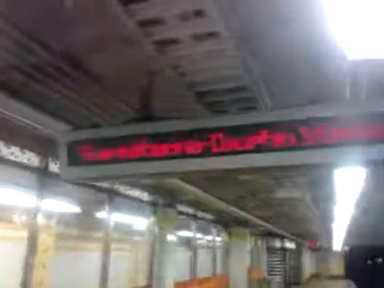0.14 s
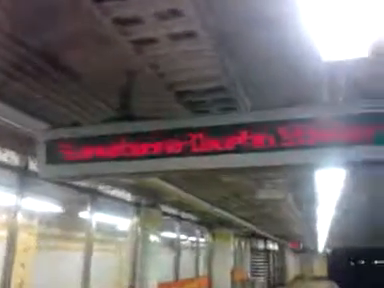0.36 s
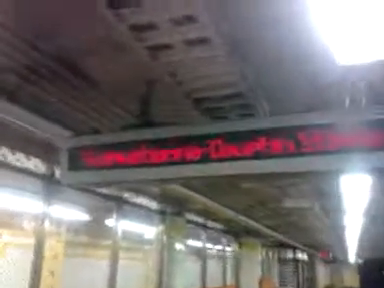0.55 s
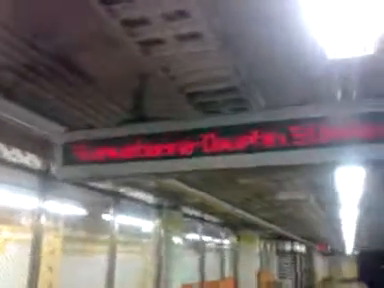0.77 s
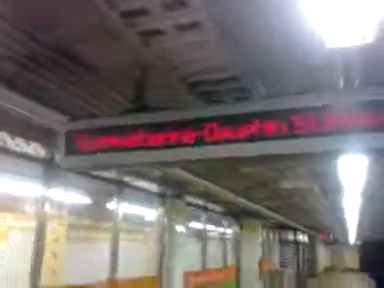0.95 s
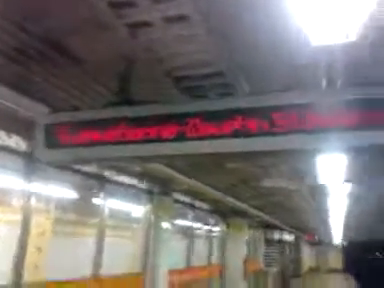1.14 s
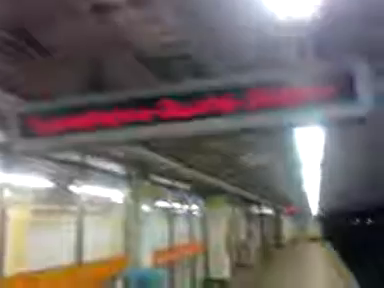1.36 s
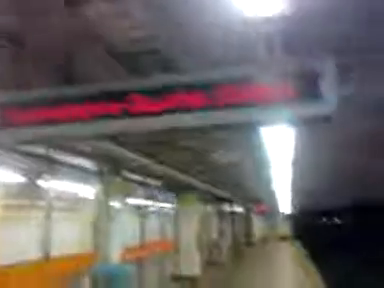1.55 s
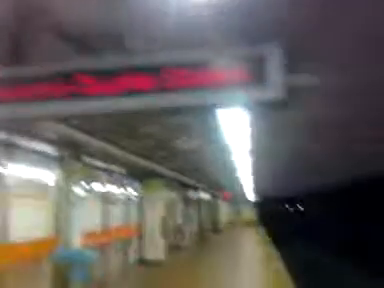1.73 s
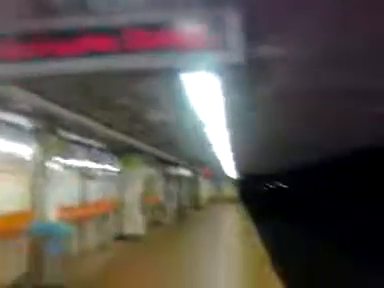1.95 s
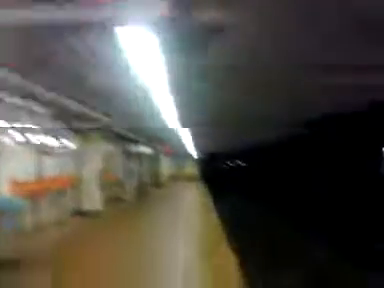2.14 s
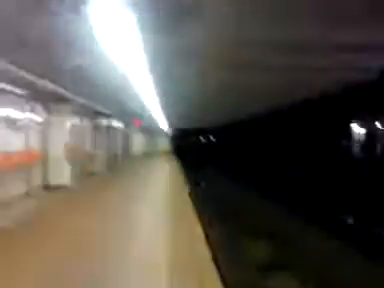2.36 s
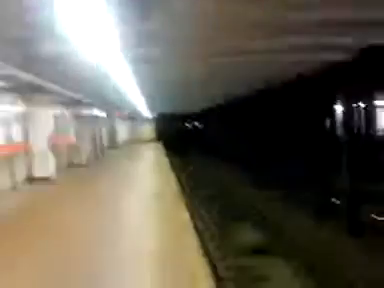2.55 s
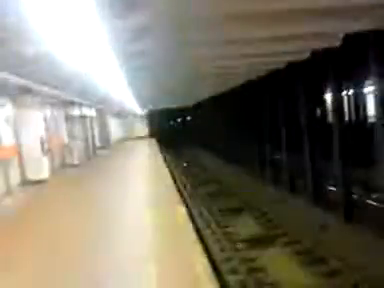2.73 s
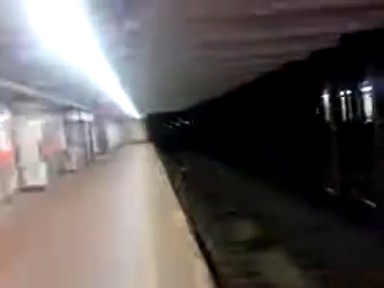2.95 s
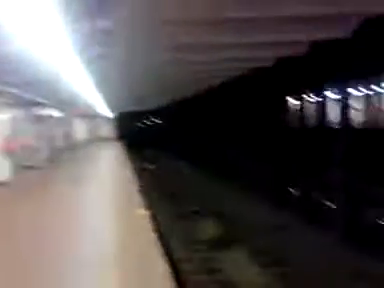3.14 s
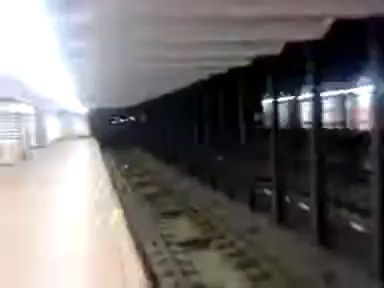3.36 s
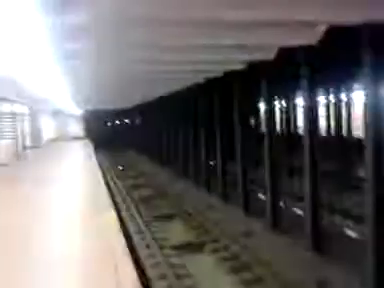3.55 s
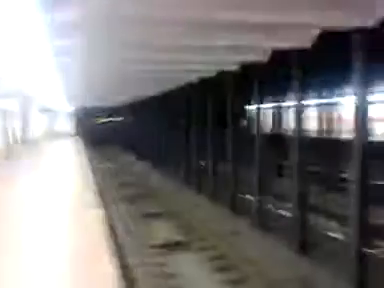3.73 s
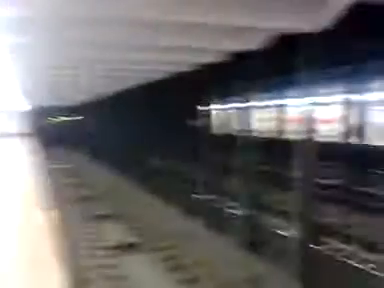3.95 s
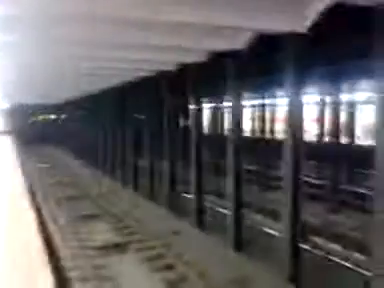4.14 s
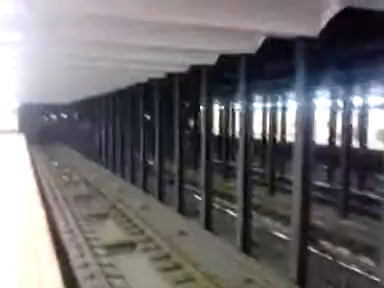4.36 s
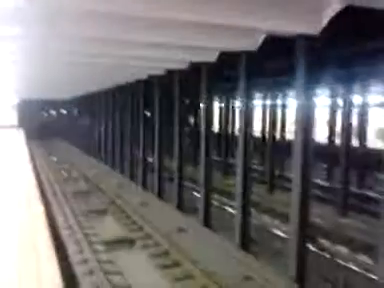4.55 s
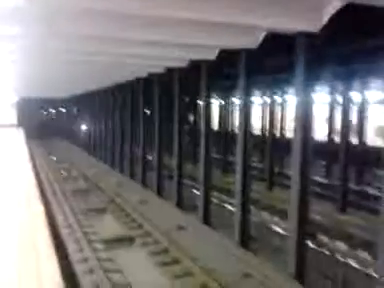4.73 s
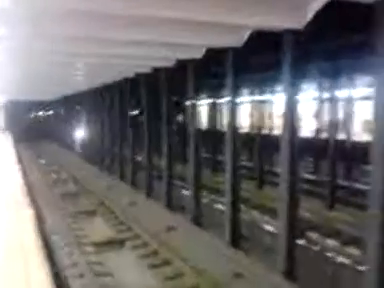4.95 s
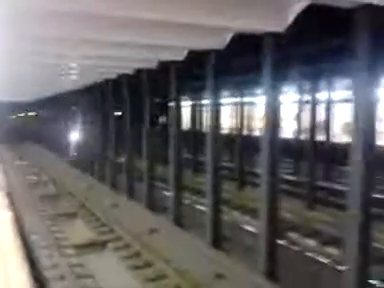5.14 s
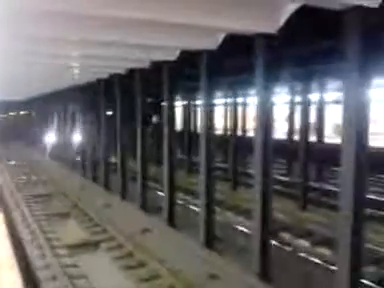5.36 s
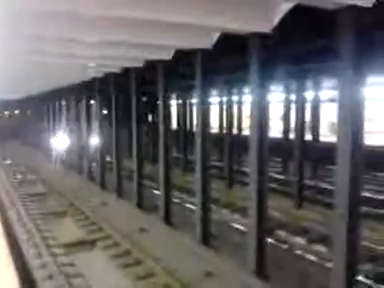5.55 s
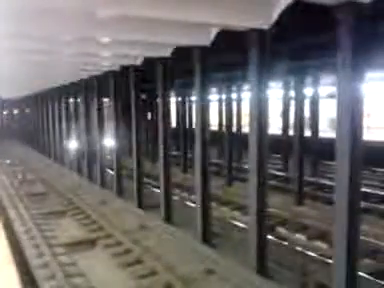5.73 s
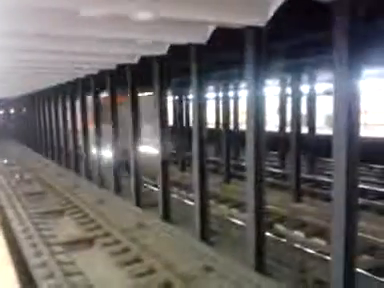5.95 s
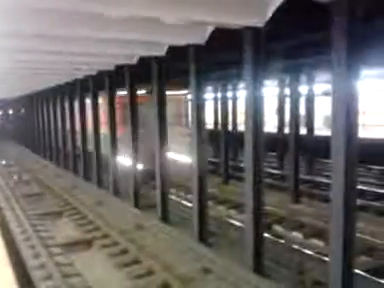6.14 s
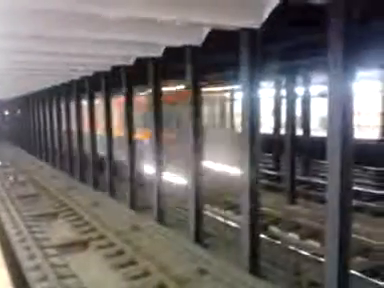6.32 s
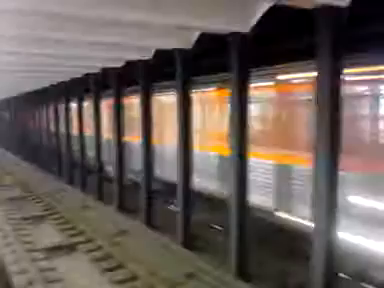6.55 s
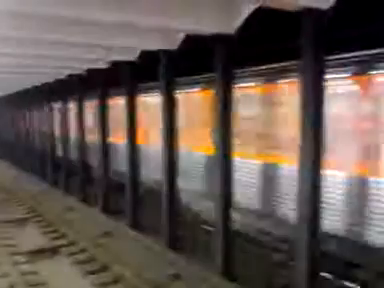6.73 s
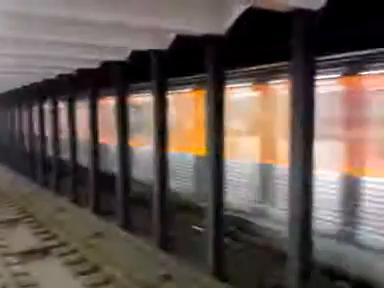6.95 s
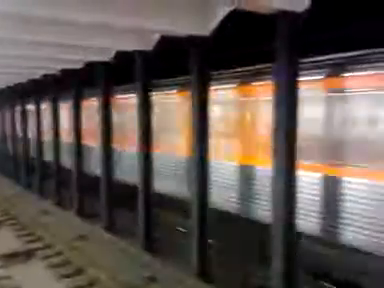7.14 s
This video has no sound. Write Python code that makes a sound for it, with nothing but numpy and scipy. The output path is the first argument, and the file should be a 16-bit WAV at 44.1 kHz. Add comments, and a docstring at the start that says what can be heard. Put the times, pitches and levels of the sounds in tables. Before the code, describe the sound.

Distant low train rumble grows for seconds, then steel wheels roar and knock past in an underground station, crackling and choking the phone microphone.

```python
"""Subway train passing a platform

A train comes out of its tunnel and runs past, heard by a small telephone-band microphone.
Shaped noise turns from dull tunnel boom to the roar and hiss of steel wheels; noise bursts clatter over it.
A short gliding sine is a flange squeak. Hard clipping adds a harsh rasp as the recorder overloads.
The level dips for instants as the train's air hits the microphone."""
import sys
import numpy as np
from scipy import signal
from scipy.fft import rfft, irfft
from scipy.io import wavfile
from scipy.ndimage import uniform_filter1d

SR = 44100
rng = np.random.default_rng(int(sys.argv[2]) if len(sys.argv) > 2 else 0)


def transcribe(u):
    """Save the signal u as a 16-bit wav file named by the first command-line argument.

    u: samples, shape (n,) or (channels, n), limited to [-1, 1]; the rate is SR.
    q: integer samples, one column per channel.
    """
    v = np.clip(np.atleast_2d(u).T, -1, 1)
    q = np.round(v * 32767).astype(np.int16)
    wavfile.write(sys.argv[1], SR, q)


N = 317079
TIME_S = np.arange(N) / SR


def amp(db):
    """Decibels to gain."""
    return 10 ** (np.asarray(db) / 20)


def unit(x):
    """Scales to an rms of one."""
    return x / np.sqrt(np.mean(x ** 2) + 1e-20)


def spectrum(points, hz):
    """Reads a table along a log-frequency axis."""
    point_hz, value = np.transpose(points)
    return np.interp(np.log(hz + 1), np.log(point_hz + 1), value)


def curve(rows, t_s):
    """Reads a two-column time table at the times t_s."""
    row_s, value = np.transpose(rows)
    return np.interp(t_s, row_s, value)


def swell(t_s, centre_s, spread_s):
    """Bell curve in time with a peak of one."""
    return np.exp(-((t_s - centre_s) / spread_s) ** 2)


# microphone response: freq_hz, gain_db
MICROPHONE_RESPONSE = [(20, -28.5), (45, -22), (90, 1), (3300, 0.5), (3600, -10), (4000, -18.5),
                       (4250, -30.5), (4500, -41.5), (4900, -72), (5500, -110)]


def microphone_db(hz):
    """The small microphone passes only a telephone band."""
    return spectrum(MICROPHONE_RESPONSE, hz)


def coloured(points):
    """Steady noise of a given colour, as the microphone hears it."""
    hz = np.fft.rfftfreq(N, 1 / SR)
    gain = amp(spectrum(points, hz) + microphone_db(hz))
    return unit(irfft(rfft(rng.standard_normal(N)) * gain, N))


def drift(count, depth_db, span_s, step_s):
    """A smooth random wander in dB, one value per step."""
    lag_s = np.arange(-count, count + 1) * step_s
    kernel = np.exp(-np.pi * (2 * lag_s / span_s) ** 2)
    return depth_db * unit(signal.fftconvolve(rng.standard_normal(3 * count), kernel, "valid"))


def patches(shape, size):
    """Random unevenness over (frames, bins), in patches of the given size."""
    field = uniform_filter1d(rng.standard_normal(shape), size[0], axis=0)
    return unit(uniform_filter1d(field, size[1], axis=1))


# air pushed ahead of the train: centre_s, spread_s, extra_rumble_db
PUSHED_AIR = (4.05, 0.35, 2.8)


def air_push_db(t_s):
    """Air pushed ahead of the train booms at the tunnel mouth: one swell of deep rumble."""
    centre_s, spread_s, extra_rumble_db = PUSHED_AIR
    return extra_rumble_db * swell(t_s, centre_s, spread_s)


# tunnel mouth resonates as the first car leaves it: centre_s, spread_s, centre_hz, width_hz, level_db
HOLLOW_RESONANCE = (5.0, 0.51, 355, 53, 2.6)


def mouth_resonance_db(t_s, hz):
    """A low hollow resonance of the tunnel mouth swells and fades."""
    centre_s, spread_s, centre_hz, width_hz, level_db = HOLLOW_RESONANCE
    return level_db * swell(t_s, centre_s, spread_s) / (1 + ((hz - centre_hz) / width_hz) ** 2)


def judder(depth_db=0.2, size_samples=2500):
    """Many distant joints make the whole roar shake slightly."""
    wander = signal.oaconvolve(rng.standard_normal(N), np.hanning(size_samples), "same")
    return amp(depth_db * unit(wander))


# flange on rail: start_s, length_s, pitch_hz, rise_over_length_hz, level_db
FLANGE_SQUEAK = (6.877, .025, 1490, 130, 3.5)


def squeak():
    """One wheel mode swells and dies, sliding up a little."""
    start_s, length_s, pitch_hz, rise_hz, level_db = FLANGE_SQUEAK
    progress = np.clip((TIME_S - start_s) / length_s, 0, 1)
    turns = np.cumsum(pitch_hz + rise_hz * progress) / SR
    return amp(level_db) * np.sin(np.pi * progress) ** 2 * np.sin(2 * np.pi * turns)


# wheels over rail joints: start_s, level_re_roar_db, decay_s
JOINT_KNOCKS = [(5.325, -1, 0.017), (5.57, -3.5, 0.025), (5.94, -2, 0.017), (6.209, 2.5, 0.019),
                (6.353, 2, 0.027), (6.45, -5.5, 0.02), (6.583, -2, 0.029), (6.743, 4.5, .018),
                (6.934, 2, 0.046), (7.055, -1.5, .025), (7.109, -1.5, 0.023)]
# colour a knock rings with: freq_hz, density_db_per_hz
KNOCK_COLOUR = [(100, -22), (400, -1.5), (800, 8.5), (1200, 1), (1700, -1.5), (2500, 0), (3300, -5.5)]


def clatter(rise_s=0.0089):
    """Each rail-joint knock is smeared by the station's walls into a short bright burst."""
    envelope = np.zeros(N)
    for start_s, level_db, decay_s in JOINT_KNOCKS:
        age_s = np.maximum(TIME_S - start_s, 0)
        rise = np.minimum(age_s / rise_s, 1)
        decay = np.exp(-np.maximum(age_s - rise_s, 0) / decay_s)
        envelope += amp(level_db) * rise * decay
    return envelope * coloured(KNOCK_COLOUR)


# train place, 0 deep in tunnel, 1 at mouth, 2 alongside (held there): time_s, nearness
TRAIN_PLACE = [(.4, 0), (3.7, 0.95), (4.5, 1), (6, 2.15)]
# rolling colour at those three places: freq_hz, density_db_per_hz
TUNNEL_COLOUR = [(90, -6), (150, -5), (200, 0.0), (280, -4.0), (335, -12), (480, -8), (620, -6.5),
                 (790, -2.9), (1170, -12), (1650, -12), (2000, -21), (2400, -21.5), (2950, -27.0),
                 (3250, -23.6)]
MOUTH_COLOUR = [(90, -14), (150, -13.5), (190, -6.5), (270, -4.5), (370, -1.9), (500, -0.2), (600, -2),
                (790, -0.5), (1170, -8.9), (1600, -12.2), (2050, -21.4), (2450, -19.5), (2900, -22.5),
                (3250, -23.5)]
ALONGSIDE_COLOUR = [(90, -23.5), (150, -14), (200, -12), (280, -8.5), (370, -2.5), (560, -2), (720, 1.5),
                    (900, -4), (1250, -11.5), (1620, -11.0), (1950, -16.5), (2500, -18.5), (2850, -21.5),
                    (3250, -19)]
# treble above the rolling colour: time_s, level_db
TREBLE_LEVEL = [(0.4, 0.3), (2.7, -2.9), (3.4, -1.7), (4.4, 1.5), (5.8, 0.2), (7.0, 0.7)]
# uneven rail makes rumble and hiss drift apart: depth_db, span_s
RUMBLE_WANDER = (1.1, 0.25)
HISS_WANDER = (0.5, 0.2)


def rolling(size=2048, patchy_db=1.45, rumble_hz=260, hiss_hz=1550):
    """Rough wheels on rough rail, at even power: tunnel boom gives way to rail resonances and hiss."""
    hop = size // 4
    t_s = np.arange(N // hop + 3) * hop / SR
    hz = np.fft.rfftfreq(size, 1 / SR)
    frame_s = t_s[:, None]

    nearness = np.clip(curve(TRAIN_PLACE, frame_s), 0, 2)
    colour_db = 0
    for place, colour in enumerate([TUNNEL_COLOUR, MOUTH_COLOUR, ALONGSIDE_COLOUR]):
        share = np.maximum(1 - abs(nearness - place), 0)
        colour_db = colour_db + share * spectrum(colour, hz)

    rumble_db = air_push_db(t_s) + drift(len(t_s), *RUMBLE_WANDER, hop / SR)
    hiss_db = curve(TREBLE_LEVEL, t_s) + drift(len(t_s), *HISS_WANDER, hop / SR)
    colour_db = colour_db + rumble_db[:, None] / (1 + (hz / rumble_hz) ** 6)
    colour_db = colour_db + hiss_db[:, None] * (1 - 1 / (1 + (hz / hiss_hz) ** 5))
    colour_db = colour_db + mouth_resonance_db(frame_s, hz)

    # each wheel meets its own stretch of worn rail, so the bands flicker apart
    flicker_db = patchy_db * patches(colour_db.shape, size=(4, 14))
    gain = amp(colour_db + microphone_db(hz) + flicker_db)
    gain = gain / np.linalg.norm(gain, axis=1, keepdims=True)  # even power in every frame
    noise = rng.standard_normal(gain.shape) + 1j * rng.standard_normal(gain.shape)
    _, sound = signal.istft((gain * noise).T, nperseg=size, noverlap=size - hop)
    return unit(sound[:N])


START_DB, GROWTH_DB_PER_S, ALONGSIDE_S = -30.15, 4.2, 6.3
# faster climb as the first car nears the open station: start_s, length_s, extra_db
STATION_CLIMB = (3.4, 2.5, 2.35)


def approach_db(t_s):
    """The tunnel absorbs an equal share per metre: an even climb, steeper near the mouth, then steady."""
    start_s, length_s, extra_db = STATION_CLIMB
    climb_db = GROWTH_DB_PER_S * np.minimum(t_s, ALONGSIDE_S)
    return START_DB + climb_db + extra_db * np.clip((t_s - start_s) / length_s, 0, 1)


def scene():
    """Rolling noise and clatter grow together as the train closes in."""
    train = rolling() * judder() + clatter()
    return (amp(approach_db(TIME_S)) * train + squeak())[None]


# gusts on the microphone; depth is full only if length exceeds fall + recovery: start_s, length_s, depth_db
GUST_CHOKES = [(6.19, 0.019, -11), (6.723, 0.02, -14), (6.754, 0.012, -16), (6.767, 0.008, -9),
               (6.833, 0.02, -7), (6.891, 0.015, -9), (6.914, 0.018, -16), (7.084, 0.017, -12),
               (7.149, 0.012, -8), (7.174, 0.016, -11)]


def choke(fall_s=0.002, recovery_s=0.009):
    """The level dips for about a hundredth of a second, as when a gust pins the diaphragm."""
    dip_db = np.zeros(N)
    for start_s, length_s, depth_db in GUST_CHOKES:
        fall = (TIME_S - start_s) / fall_s
        recovery = (start_s + length_s - TIME_S) / recovery_s
        dip_db += depth_db * np.clip(np.minimum(fall, recovery), 0, 1)
    return amp(dip_db)


def record(dry, clip_level=0.705, edge_hz=15800):
    """Hard clipping makes the treble above the microphone's band: lone ticks, then a dense rasp."""
    clipped = np.clip(dry * choke(), -clip_level, clip_level)
    low_pass = signal.firwin(511, edge_hz, window=("kaiser", 9), fs=SR)
    return signal.oaconvolve(clipped, low_pass[None], "same")


dry = scene()
out = record(dry)
transcribe(out)
```